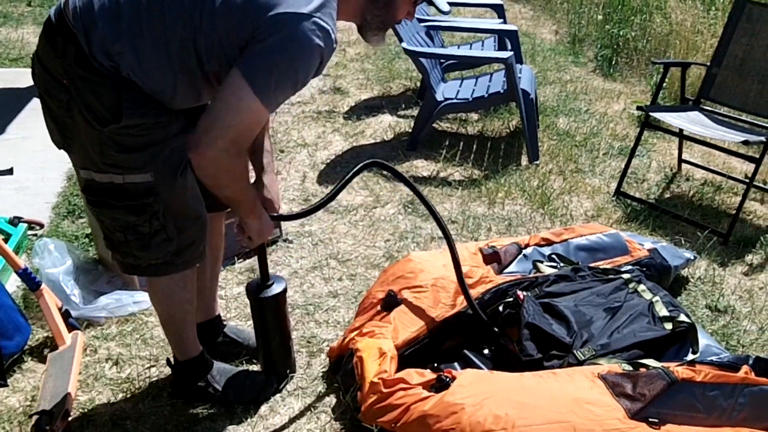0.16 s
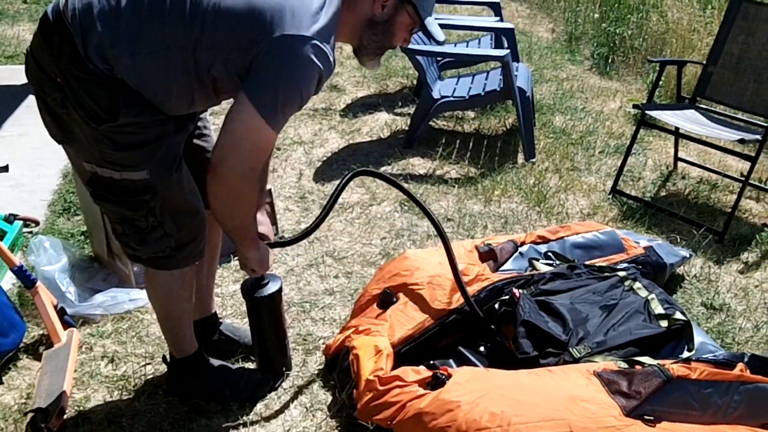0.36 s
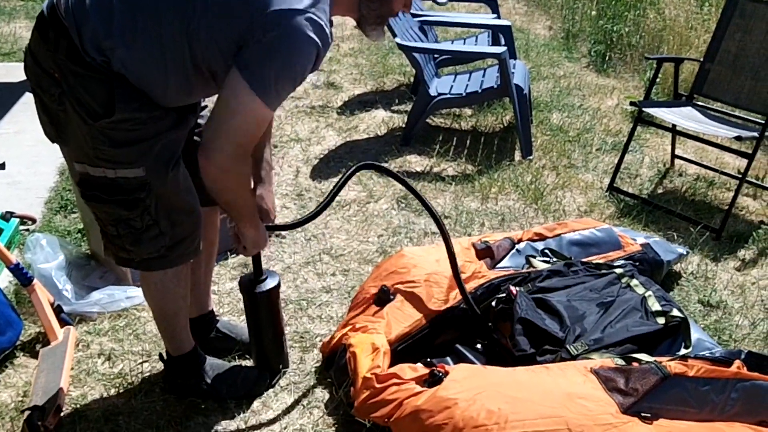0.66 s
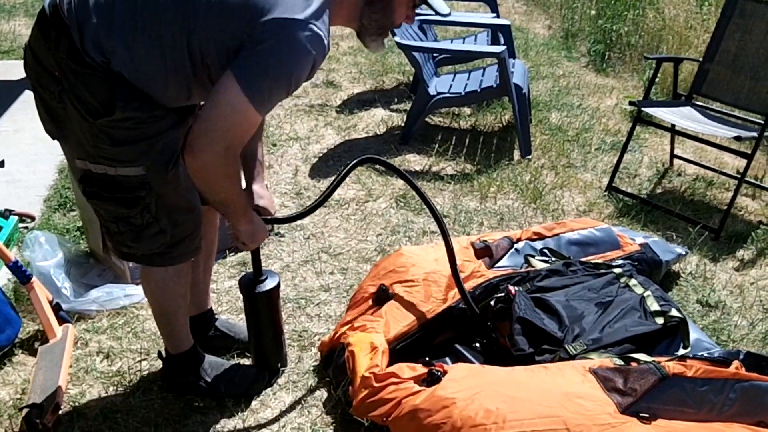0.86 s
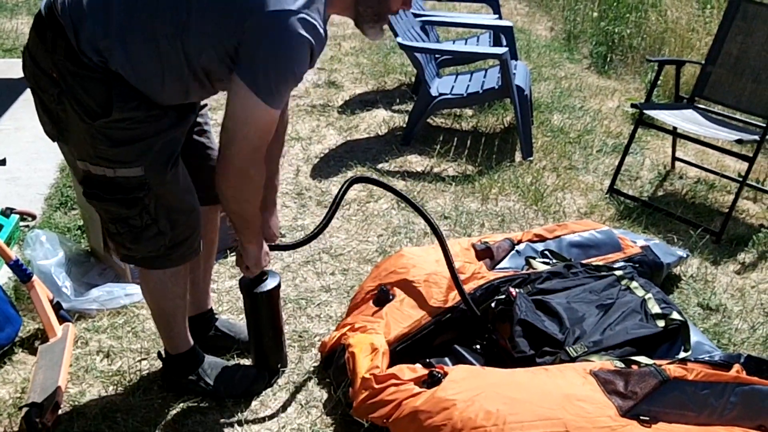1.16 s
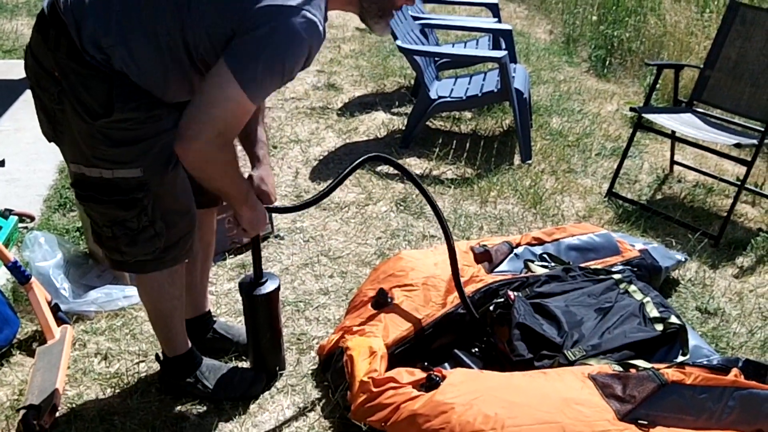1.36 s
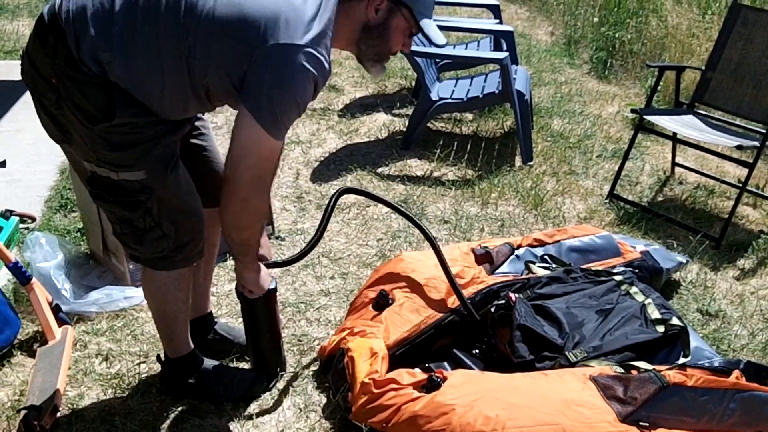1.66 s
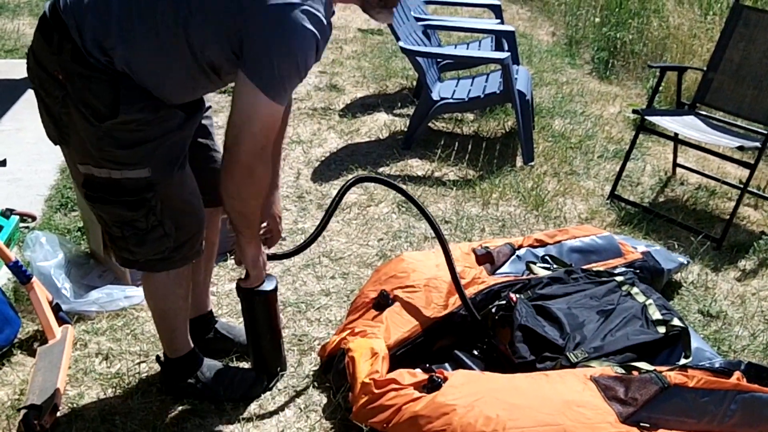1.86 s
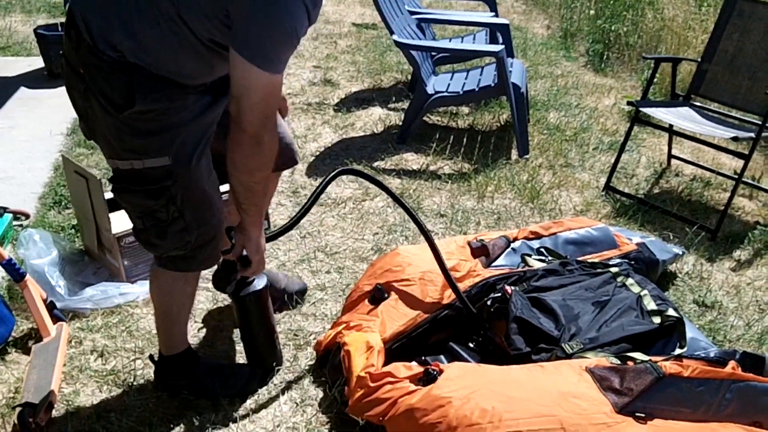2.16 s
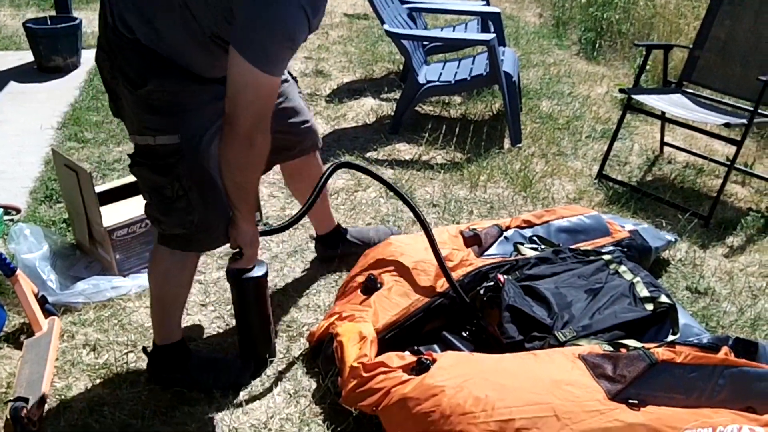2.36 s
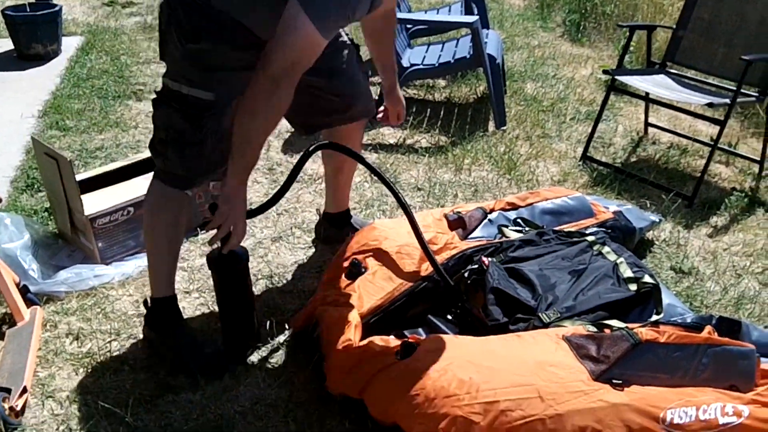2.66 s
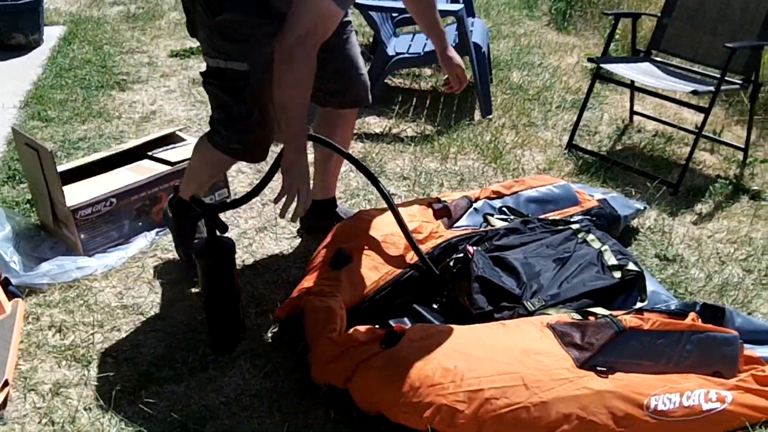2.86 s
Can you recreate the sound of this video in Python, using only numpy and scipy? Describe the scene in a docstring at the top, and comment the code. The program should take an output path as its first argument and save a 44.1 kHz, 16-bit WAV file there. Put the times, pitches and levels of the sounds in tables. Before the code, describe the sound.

Air hisses in and out of a hand pump in quick, even strokes, with piston knocks and thin whistles. Then the pumping ends, leaving soft rustling and handling clicks, a faint distant hum and light wind on the microphone.

```python
"""A double-action hand barrel pump fills an inflatable seat on a lawn, over a faint far hum and light wind.
It opens on the tail of a push; three pulls and three pushes follow. On each stroke air hisses through
the valves and hose, and the piston knocks at the end of its travel; the pushes carry thin whistles.
At about 1.8 s the pumping stops: clothes and dry grass rustle, and the pump and hose click."""
import sys
import numpy as np
from scipy import signal
from scipy.fft import rfft, irfft
from scipy.io import wavfile
from scipy.ndimage import uniform_filter1d

SR = 44100
rng = np.random.default_rng(int(sys.argv[2]) if len(sys.argv) > 2 else 0)


def put_to_file(sound):
    """Save the sound as 16-bit audio at rate SR, in the file named by the first command-line argument."""
    columns = np.atleast_2d(sound).T  # one column per channel
    safe = np.clip(columns, -1, 1)
    whole_steps = np.round(safe * 32767)
    wavfile.write(sys.argv[1], SR, whole_steps.astype(np.int16))


N = 132300
SOUND_M_PER_S = 343

# outdoor air bed and wind rumble: freq_hz, gain_db
AIR_EQ = [(25, -18), (66, -21), (150, -15.5), (260, -5), (400, -9.5), (560, -4), (1090, -4.5),
          (1350, -10.5), (2200, -11.5), (3010, -15), (5280, -21), (7000, -27), (7900, -49.5), (9500, -28.5),
          (15000, -29)]
WIND_EQ = [(15, -18), (35, 18), (70, 6), (120, -24), (300, -63), (1000, -72)]
# wind gusts: time_s, level_db
GUSTS = [(0, -74), (.1, -37), (.17, -52), (.26, -43.5), (.4, -58), (.9, -72), (1.3, -57), (1.75, -53.5),
         (1.95, -48), (2.15, -56), (2.23, -43), (2.35, -80), (2.47, -48), (2.55, -42.5), (2.65, -52),
         (3, -58)]
# far motor: pitch_hz, level_db
MOTOR_HUM = [(80, -59.5), (120, -65.5), (160, -64), (240, -53)]

# handle down, handle up: start_s, end_s, level_db, fastest_at_share, treble_db
PUSHES = [(-.2, 0.062, -22, 0.53, 0), (0.31, 0.622, -24.5, .58, 0.88), (0.872, 1.207, -25, 0.61, 0.39),
          (1.497, 1.808, -23.5, 0.57, 0.045)]
PULLS = [(.06, 0.362, -21, 0.44, 0), (0.619, 0.936, -22, 0.49, -2), (1.196, 1.538, -21, 0.43, 3)]
# valve hiss at full speed: freq_hz, gain_db
PUSH_EQ = [(100, -10), (400, -16.5), (800, 0), (1400, -6.5), (2100, 4), (2700, -1.5), (3250, -4), (4200, 3),
           (4800, -7), (5600, -7.5), (6500, -11.5), (7300, -23), (8000, -37), (8800, -27.5), (10500, -21.5),
           (15000, -39.5)]
PULL_EQ = [(100, -20), (400, -17.5), (800, -11), (1400, -5.5), (2100, 2.5), (2700, -1), (3250, -4.5),
           (4200, 2.5), (5100, -5.5), (6300, -10.5), (7300, -11), (8000, -44), (8800, -22), (10300, -18.5),
           (12000, -23.5), (12900, -17.5), (15000, -32)]
# resonances of the outlet (push) and intake (pull): centre_hz, width_hz, boost_db
OUTLET_PEAKS = [(510, 52, 6.5), (645, 21, 6), (1240, 83, 6), (1517.5, 68, 17), (2580, 130, 6.5),
                (2945, 96, 10.5), (3700, 66, 2.5), (3917, 110, 7.5), (4456, 66, 13), (4910, 56, 14),
                (5070, 33, -6), (5270, 52, 16.5)]
INTAKE_PEAKS = [(540, 44, 6), (670, 55, 9), (1200, 26, 3), (1338, 24, 8), (1945, 320, 4), (2540, 55, 6),
                (3030, 64, 7), (3340, 43, 6.5), (3910, 220, 2), (5200, 38, 3), (5600, 88, 12),
                (6050, 63, 18.5)]
# how steeply the hiss follows air speed: freq_hz, speed_exponent
PUSH_GROWTH = [(300, 0.17), (1000, 1.28), (2000, 1.8), (4000, 1.74), (5500, 2.03), (13000, 1.8)]
PULL_GROWTH = [(300, 0.31), (1000, 0.61), (2000, 1.54), (4000, 1.58), (6000, 1.87), (13000, 2.16)]
# tone shift from the start of a stroke to its end: freq_hz, change_db
PUSH_MORPH = [(300, -9.5), (1100, -5.5), (2000, -6), (2900, 6), (4000, 1), (5300, 18.5), (7000, 1),
              (13000, -4)]
PULL_MORPH = [(300, -6), (1300, -3), (2100, 0), (3000, 6), (4300, 6.5), (6300, 15), (13000, 11)]

# piston on its end stops: time_s, level_db, lowpass_hz, ring_stretch (below 1 is shorter and higher)
PISTON_THUDS = [(.057, -21.5, 2200, 0.9), (.065, -26, 1200, 1), (0.3208, -6, 800, 0.53),
                (.3298, -4.5, 1300, 0.58), (0.3334, -3.5, 590, 0.79), (0.3371, -7.5, 2680, 0.48),
                (.629, -21, 1400, 0.98), (.642, -26.5, 900, 0.93), (0.9073, -5.5, 1200, 0.31),
                (0.9102, -5, 1490, 0.43), (0.9162, -8, 1000, 0.61), (1.189, -23, 900, 0.91),
                (1.198, -18.5, 1200, 0.84), (1.482, -14, 700, 0.74), (1.492, -2.5, 890, 0.55),
                (1.4987, -3, 1100, 0.49), (1.5015, -1, 800, 0.47), (1.805, -12.5, 2430, 0.98),
                (1.8141, -16.5, 1610, 1), (1.8228, -13.5, 1610, 0.95), (1.843, -30, 900, 0.73)]
# pump foot on the ground, handle shaft on the cap: time_s, level_db
FOOT_BUMPS = [(0.057, -27.5), (0.117, -30), (0.335, -25), (0.642, -32), (0.672, -30.5), (.91, -35),
              (1.193, -25.5), (1.499, -19.5), (1.807, -26.5), (1.835, -24.5)]
SHAFT_CLACKS = [(0.3382, -15), (0.9091, -5), (0.9134, -12), (1.5067, -5), (1.8061, -20)]
# ring of the free barrel, the foot and ground, the cap: pitch_hz, gain_db, t60_s
BARREL_MODES = [(122, -11.5, 0.11), (179, -12.5, .1), (321, -9, 0.14), (414, -14.5, 0.11),
                (541.7, -1.5, 0.11), (636, 0, 0.062), (775, 2, 0.053), (992, 2.5, .045), (1121, 3.5, 0.058),
                (1220, -7.5, 0.074), (1520, 5.5, 0.054), (1640, -19, 0.083), (1974, 9, 0.012),
                (2380, 1.5, 0.024)]
FOOT_MODES = [(92, -9, 0.075), (175, 3.5, 0.045), (223, -5, 0.091)]
CAP_MODES = [(2700, 0.5, 0.023), (3060, 0.5, 0.0062), (3705, -1.5, 0.025), (4130, 4.5, 0.0094),
             (4900, -1.5, 0.0059), (6170, -2.5, 0.0045)]
# loose plastic after a thud, first contact of a clack: freq_hz, gain_db
RATTLE_EQ = [(80, -12), (150, 0), (260, -4), (450, -2), (560, 10), (680, 15), (800, -8.5), (1150, 2),
             (1600, -27), (2500, -25), (4500, -4.5), (7000, -30), (15000, -45)]
CRACK_EQ = [(100, 5), (600, -15), (1500, -8), (2500, 1), (4000, -12), (6000, -5), (7500, -33), (15000, -32)]

# valve whistles: start_s, length_s, from_hz, to_hz, level_db
WHISTLES = [(0.447, 0.079, 15100, 12700, -43), (0.515, 0.019, 8700, 8150, -43),
            (1.066, 0.044, 15300, 13200, -44), (1.70, .032, 14200, 12700, -41.5),
            (1.822, 0.039, 9100, 11000, -48)]

# cloth and grass swishes: start_s, attack_s, t60_s, level_db, lowpass_hz
SWISHES = [(1.818, 0.036, 0.12, -38.5, 9000), (2.0, 0.023, 0.75, -35, 5140),
           (2.441, 0.048, 0.32, -43.5, 4500), (2.66, .11, 0.81, -40.5, 2780)]
# ticks of handling and steps: time_s, level_db, t60_s, lowpass_hz
TAPS = [(2.014, -53, .12, 1800), (2.14, -38, 0.11, 1300), (2.2678, -18.5, .05, 3370),
        (2.277, -28, 0.062, 2500), (2.38, -35, .1, 1490), (2.479, -31, 0.074, 2500),
        (2.54, -35, 0.0092, 7000), (2.554, -27.5, 0.0095, 7000), (2.62, -35, 0.09, 1500),
        (2.630, -28, 0.021, 2200)]
# tone of the swishes and the taps: freq_hz, gain_db
SWISH_EQ = [(100, -13), (400, -9.5), (800, -7.5), (1600, -1.5), (3000, -5), (5500, -4.5), (7800, -24),
            (10000, -15), (15000, -16)]
TAP_EQ = [(60, -12), (280, -6), (420, -9), (560, -1), (700, -5.5), (930, 6.5), (1120, -10), (1320, -8),
          (1570, 2.5), (2050, -6.5), (3300, -8), (5000, -9), (7500, -42), (15000, -38)]


def amp(db):
    """Decibels to gain."""
    return 10 ** (np.asarray(db) / 20)


def unit(x):
    """Scales to rms 1."""
    return x / np.sqrt(np.mean(x ** 2) + 1e-20)


def read(curve, hz):
    """Reads a curve on a log-frequency axis."""
    f, value = np.transpose(curve)
    return np.interp(np.log(hz + 1), np.log(f + 1), value)


def add(mix, s, sound):
    """Mixes a sound in at time s."""
    part = mix[max(round(s * SR), 0):][:len(sound)]
    part += sound[:len(part)]


def equalise(x, eq):
    """Shapes x with an EQ curve, at rms 1."""
    return unit(irfft(rfft(x) * amp(read(eq, np.fft.rfftfreq(len(x), 1 / SR))), len(x)))


def lowpass(x, hz, order=1):
    """Rolls off the top end."""
    return signal.lfilter(*signal.butter(order, hz, fs=SR), x)


def wander(rate_hz):
    """Smooth random modulation, rms 1."""
    rolloff = np.exp(-(np.fft.rfftfreq(N, 1 / SR) / rate_hz) ** 2)
    return unit(irfft(rfft(rng.standard_normal(N)) * rolloff, N))


def bell(hz, centre, width):
    """Bell curve of a resonance, height 1."""
    return 1 / (1 + (2 * (hz - centre) / width) ** 2)


def ring(modes, t):
    """A struck part rings as a set of dying sines."""
    size = np.linalg.norm([amp(db) for _, db, _ in modes])
    return sum((-1) ** k * amp(db - 60 * t / t60) * np.sin(2 * np.pi * hz * t)
               for k, (hz, db, t60) in enumerate(modes)) / size


def garden(air_db=-43, air_swell_db=-0.03, hum_waver=0.0069, hum_swell_db=4.0):
    """The bed: outdoor air, a far motor's wavering hum and light wind on the microphone."""
    air = equalise(rng.standard_normal(N), AIR_EQ) * amp(air_db + air_swell_db * wander(18))
    motor_time = np.cumsum(1 + hum_waver * wander(27)) / SR
    hum = sum(amp(db) * unit(np.sin(2 * np.pi * hz * motor_time) * amp(hum_swell_db * wander(5.1)))
              for hz, db in MOTOR_HUM)
    gusts = amp(np.interp(np.arange(N) / SR, *np.transpose(GUSTS)))
    return air + hum + equalise(rng.standard_normal(N), WIND_EQ) * gusts


def valve_hiss(start, end, db, fastest_at, treble_db, pull, leak=0.014, flutter_db=0.39):
    """One stroke: air through a valve swells and brightens with piston speed, in uneven patches."""
    eq, peaks, growth, morph = ((PULL_EQ, INTAKE_PEAKS, PULL_GROWTH, PULL_MORPH) if pull else
                                (PUSH_EQ, OUTLET_PEAKS, PUSH_GROWTH, PUSH_MORPH))
    frames = dict(fs=SR, nperseg=1024, noverlap=896)
    hz, t, noise = signal.stft(rng.standard_normal(N), **frames)
    hz = hz[:, None]
    progress = np.interp(t, [start, start + fastest_at * (end - start), end], [0, .5, 1])
    speed = np.sin(np.pi * progress) + leak * (t > start) * (t < end) + 1e-9
    tone_db = read(eq, hz) + sum(boost * bell(hz, centre, width) for centre, width, boost in peaks)
    tone_db = tone_db + read(morph, hz) * (progress - .5)
    tone_db += treble_db * np.interp(hz, [2000, 7000], [0, 1])
    if not pull:
        tone_db += outlet_flap(hz, progress)
    tone = amp(tone_db) * air_column(hz, progress, pull)
    tone /= np.sqrt(np.mean(tone[:, speed.argmax()] ** 2))
    patches = uniform_filter1d(rng.standard_normal(noise.shape), size=6, axis=0)
    patches = unit(uniform_filter1d(patches, size=16, axis=1))
    flicker = amp(patches * np.interp(hz, [5000, 9000], [0.95, 4.5]))  # the treble flickers most
    swell = speed ** np.maximum(read(growth, hz), .3)
    hiss = signal.istft(noise * tone * flicker * swell, **frames)[1][:N]
    return hose(hiss) * amp(db + flutter_db * wander(70))


def outlet_flap(hz, progress, from_hz=1854, rise_hz=383, width_hz=55, boost_db=16):
    """The outlet valve's resonance, in dB: it climbs and fades through a push."""
    return boost_db * (1 - progress) * bell(hz, from_hz + rise_hz * progress, width_hz)


def air_column(hz, progress, pull, shortest_m=0.1258, travel_m=0.256, echo=0.1):
    """A gentle comb sweep: the air in the barrel lengthens on a pull and shortens on a push."""
    travelled = (1 - np.cos(np.pi * progress)) / 2
    length_m = shortest_m + travel_m * (travelled if pull else 1 - travelled)
    return 1 / abs(1 - echo * np.exp(4j * np.pi * hz * length_m / SOUND_M_PER_S))


def hose(x, length_m=2.299, bass_echo=0.23, loss_hz=5000):
    """Sound runs up and down the corrugated hose, fainter and duller at each round trip."""
    hz = np.fft.rfftfreq(N, 1 / SR)
    echo = bass_echo / (1 + (hz / loss_hz) ** 2)
    round_trip = np.exp(-4j * np.pi * hz * length_m / SOUND_M_PER_S)
    return irfft(rfft(x) * np.sqrt(1 - echo ** 2) / (1 - echo * round_trip), N)


def knocks(rattle_db=-13, rattle_t60=0.097, crack_db=-8, crack_t60=0.0088, attack_s=0.00074):
    """The piston thuds: the barrel rings, rattles and bumps the ground; the shaft clacks on the cap."""
    out, t = np.zeros(N), np.arange(SR // 4) / SR
    for s, db, lowpass_hz, stretch in PISTON_THUDS:
        ring_time = t / stretch
        rattle = equalise(rng.standard_normal(len(t)), RATTLE_EQ)
        rattle *= amp(rattle_db - 60 * ring_time / rattle_t60)
        add(out, s, amp(db) * lowpass(ring(BARREL_MODES, ring_time) + rattle, lowpass_hz))
    for s, db in FOOT_BUMPS:
        add(out, s, amp(db) * ring(FOOT_MODES, t))
    for s, db in SHAFT_CLACKS:
        crack = equalise(rng.standard_normal(len(t)), CRACK_EQ) * amp(crack_db - 60 * t / crack_t60)
        clack = np.minimum(t / attack_s, 1) * (ring(CAP_MODES, t) + crack)
        add(out, s, amp(db) * lowpass(clack, hz=6500, order=2))
    return out


def yard(x, wet_db=-20, t60_s=0.22, lowpass_hz=2480, predelay_s=.012):
    """Nearby walls and furniture scatter back a weak, dark tail."""
    t = np.arange(SR // 2) / SR
    tail = lowpass(rng.standard_normal(len(t)), lowpass_hz) * amp(-60 * t / t60_s) * (t > predelay_s)
    return x + amp(wet_db) * signal.fftconvolve(x, tail / np.linalg.norm(tail))[:N]


def whistles(waver=.014, waver_hz=700, rough_db=3):
    """The valve flap sings short, airy, high glides."""
    out = np.zeros(N)
    for s, length, from_hz, to_hz, db in WHISTLES:
        n = int(length * SR)
        progress = np.linspace(0, 1, n)
        hz = (from_hz + (to_hz - from_hz) * progress) * (1 + waver * wander(waver_hz)[:n])
        envelope = amp(db + rough_db * wander(waver_hz)[:n]) * np.sin(np.pi * progress)
        add(out, s, envelope * np.sin(2 * np.pi * np.cumsum(hz) / SR))
    return out


def rustle(grain_db=2.0, grain_hz=300):
    """Cloth and dry grass brush in grainy swishes."""
    out, t = np.zeros(N), np.arange(N) / SR
    for s, attack, t60, db, lowpass_hz in SWISHES:
        fibres = rng.standard_normal(N) * amp(grain_db * wander(grain_hz))
        envelope = np.minimum(t / attack, 1) * amp(db - 60 * np.maximum(t - attack, 0) / t60)
        add(out, s, unit(lowpass(equalise(fibres, SWISH_EQ), lowpass_hz)) * envelope)
    return out


def taps():
    """Pump, hose and feet tap in short, dry bursts of noise."""
    out, t = np.zeros(N), np.arange(N) / SR
    for s, db, t60, lowpass_hz in TAPS:
        burst = unit(lowpass(equalise(rng.standard_normal(N), TAP_EQ), lowpass_hz))
        add(out, s, burst * amp(db - 60 * t / t60))
    return out


def scene():
    """The mono mix; only knocks, taps and rustle feed the yard's tail."""
    pulls = sum(valve_hiss(*row, pull=True) for row in PULLS)
    pushes = sum(valve_hiss(*row, pull=False) for row in PUSHES)
    return (pulls + pushes + yard(knocks() + taps() + rustle()) + whistles() + garden())[None]


def record(dry, cutoff_hz=15200):
    """A steep high cut on the whole mix."""
    high_cut = signal.firwin(511, cutoff_hz, window=("kaiser", 9), fs=SR)
    return signal.oaconvolve(dry, high_cut[None], "same")


dry = scene()
out = record(dry)
put_to_file(out)
```